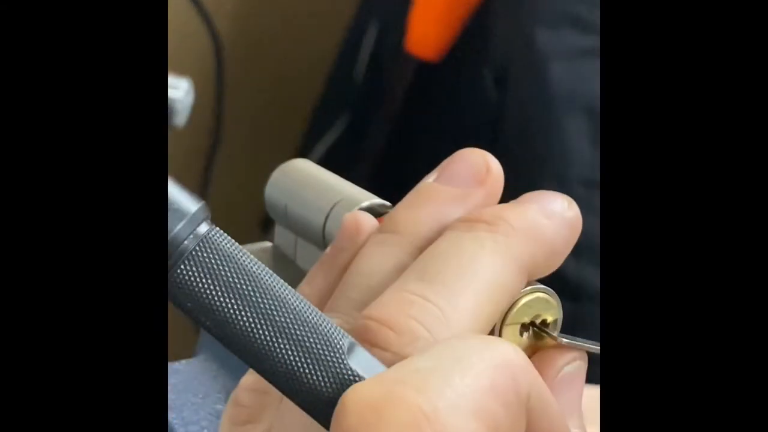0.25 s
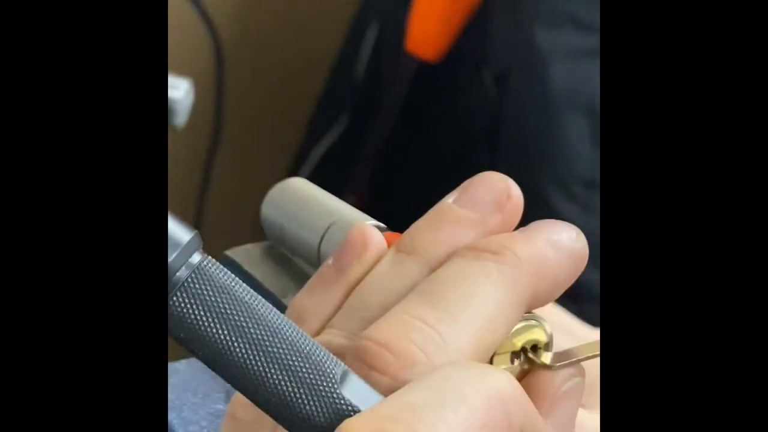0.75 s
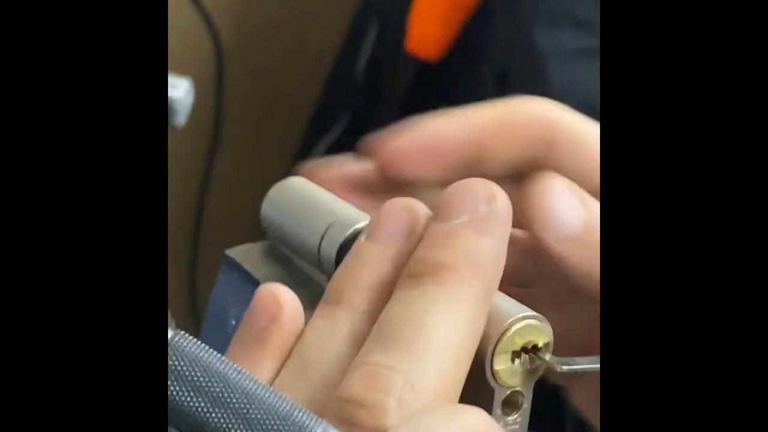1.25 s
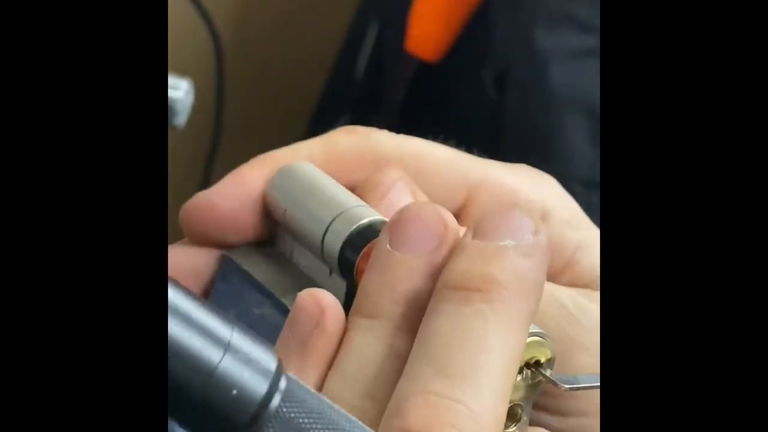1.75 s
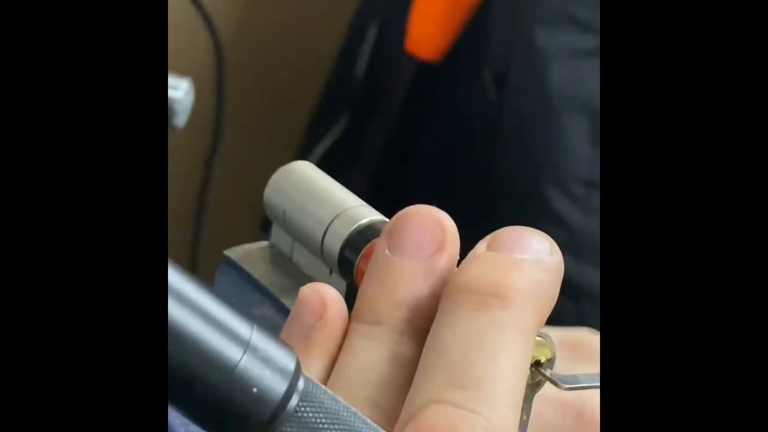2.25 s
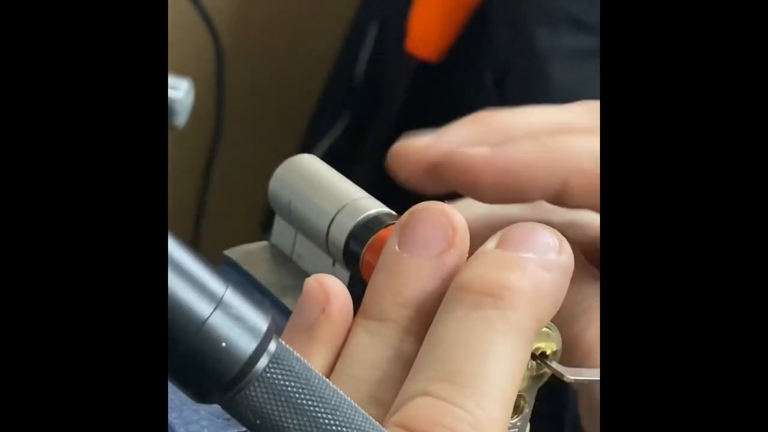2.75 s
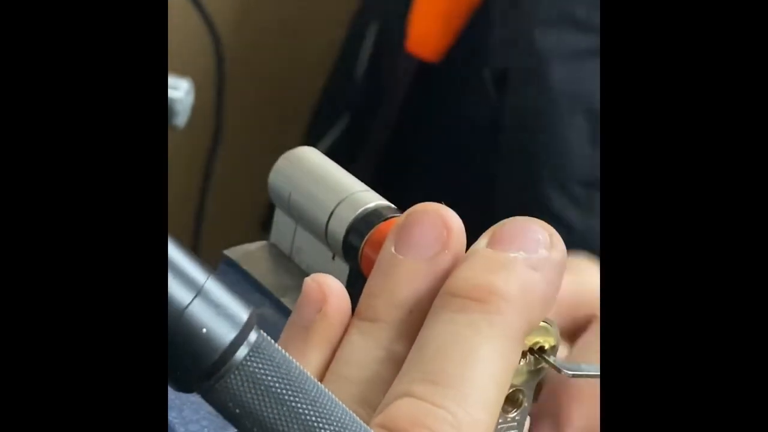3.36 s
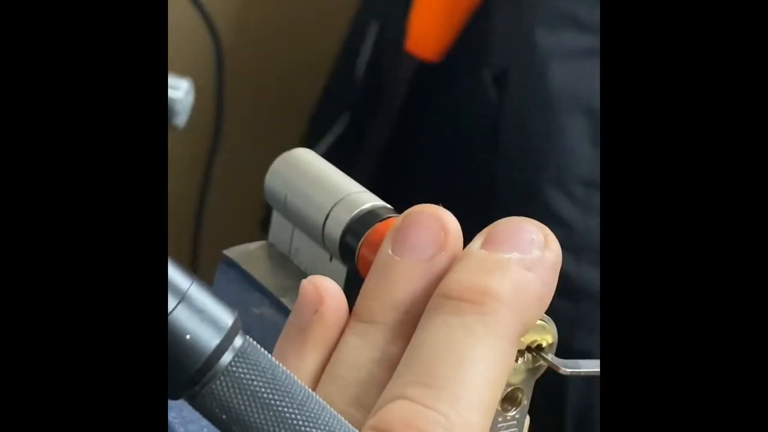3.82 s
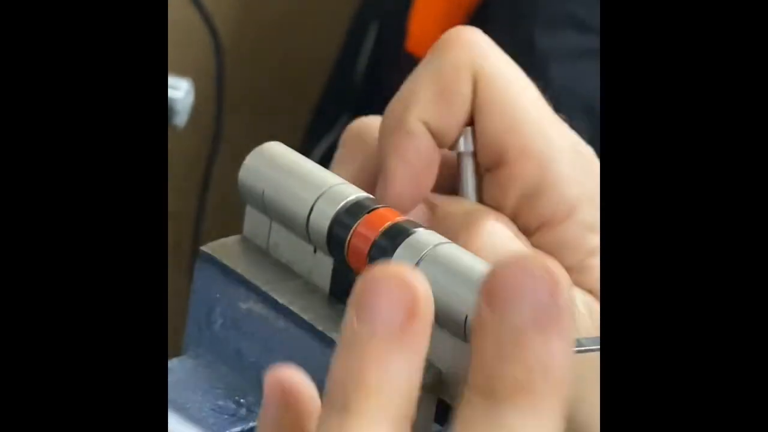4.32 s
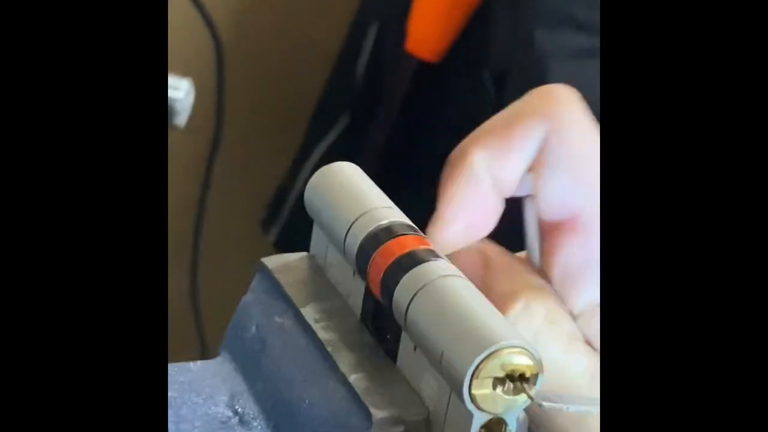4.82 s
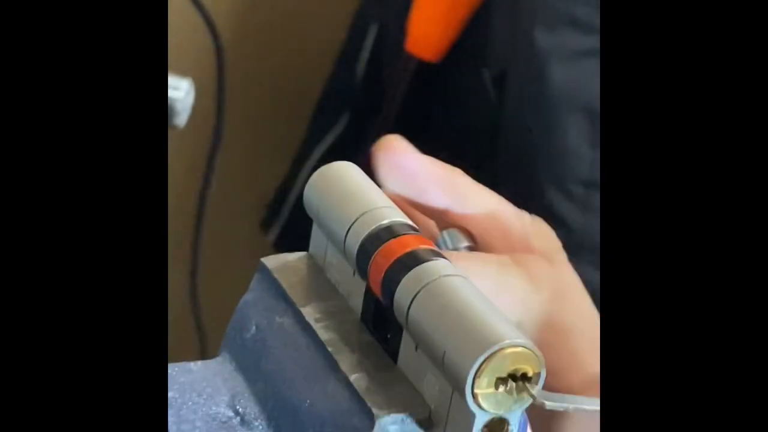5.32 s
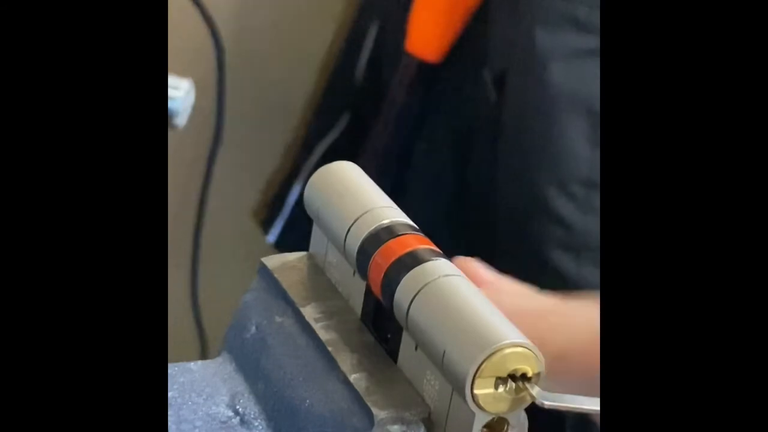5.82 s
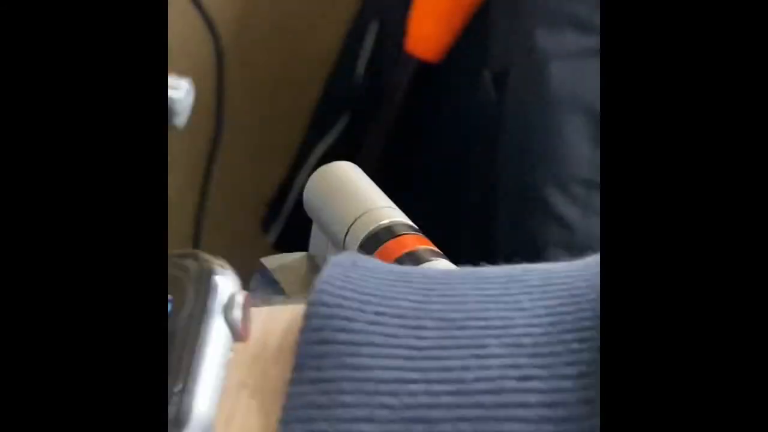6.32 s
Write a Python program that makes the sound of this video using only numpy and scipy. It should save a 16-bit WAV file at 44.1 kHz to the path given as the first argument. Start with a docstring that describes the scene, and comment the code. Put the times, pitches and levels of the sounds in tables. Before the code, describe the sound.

Small metallic ticks and soft finger rubs on a clamped lock cylinder, one very loud sharp snap with a bright ring, then quieter handling.

```python
"""A lock cylinder is handled in a bench vise: struck resonances and bursts of rattle make its ticks and snaps,
and short noise bursts through varied modes give them a bright edge. A steel part rings loudly as dying sines,
fingers and tools rub as clumped noisy slips, and short hollow notes creak.
The bench thumps in low swinging tones over a lumpy shaking.
A small quiet room adds short tails of sparse echoes and a faint hush; a pair of microphone ports hears it all."""
import sys
import numpy as np
from scipy import signal
from scipy.fft import rfft, irfft, next_fast_len
from scipy.io import wavfile
from scipy.ndimage import uniform_filter1d

SR = 44100
rng = np.random.default_rng(int(sys.argv[2]) if len(sys.argv) > 2 else 0)


def store_pcm(level_fs):
    """Save levels as 16-bit WAV."""
    pcm = np.round(np.clip(level_fs, -1, 1) * 32767).astype(np.int16)
    wavfile.write(sys.argv[1], SR, np.atleast_2d(pcm).T)


def how_loud(loudness_db):
    """Turn decibels into a plain amplitude multiplier (0 dB gives 1, 20 dB gives 10)."""
    steps = np.asarray(loudness_db, float) / 20
    return 10 ** steps


N = 290166

# ticks and snaps: (time [s], knock peak [dB], thud [dB, 7.5 below its peak], crack [dB, 7.5 below its peak],
# tilt toward the lower lock modes [dB])
TICKS = [(0.231, -58, -72.5, -99, 18.5), (0.367, -42, -45.5, -74, 1.5), (0.433, -30, -48.5, -52.5, -8),
         (0.565, -47, -64, -66.5, 8), (0.96, -46.5, -60.5, -67.5, 12), (1.022, -43, -51, -61.5, -5),
         (1.064, -48.5, -55, -66, -19), (1.098, -43, -48, -77.5, -2), (1.147, -41.5, -72, -72, -5),
         (1.162, -45.5, -56, -80, -6), (1.216, -53, -80, -65, -22), (1.46, -56.5, -73, -90, 16),
         (1.631, -49, -58.5, -91, -1), (1.79, -54, -66.5, -71, 7), (2.052, -39.5, -56, -62.5, 0.5),
         (2.112, -40.5, -61, -51.5, 2), (2.125, -35.5, -50, -71, 21), (2.188, -48, -58, -98, 25),
         (2.611, -38, -50.5, -52, -11.5), (2.621, -39, -50.5, -58, 4), (2.639, -37.5, -56.5, -52.5, -3),
         (2.74, -5.5, -25.5, -15.5, -4.5), (3.138, -52, -54, -99, 5), (3.35, -41.5, -55.5, -77, -1.5),
         (3.501, -26.5, -41.5, -33, -9.5), (3.845, -49, -73.5, -63, -11), (4.164, -48, -54, -79, -1),
         (4.171, -45.5, -65.5, -67.5, 7), (4.371, -67.5, -82, -68, -1.5), (4.578, -39.5, -52, -84, 30),
         (5.19, -63, -53.5, -87.5, -4.5), (5.516, -54.5, -53, -87.5, 8), (5.716, -68, -63, -61.5, -5.5)]
# lock in the jaws: (frequency [Hz], level [dB], t60 [s])
LOCK_MODES = [(837, -12.5, 0.043), (1087, -3, 0.023), (1747, 4, 0.014), (2522, -17.5, .018)]
# vise body: (frequency [Hz], level [dB], t60 [s])
JAW_MODES = [(310, 1, 0.018), (392, -3, .018), (473, -3.5, 0.018)]
# spectrum of the cracks: (frequency [Hz], level [dB per Hz])
CRACK_TONE = [(1470, -38), (2500, -14), (3920, -18), (4750, -13), (5360, -1.5), (5700, -0.5), (7510, -15),
              (8290, -10.5), (9220, -25.5), (10700, -12.5), (12500, -32), (14300, -20), (15500, -39)]
CRACK_FROM_HZ = 2700
# length of contact; looseness (0-1) of a -44.5 dB knock and its loss per dB of harder knock
CONTACT_S, LOOSENESS, FIRMER_PER_DB = 0.0041, 0.55, 0.08

# bright edge of the ticks: (time [s], level [dB, 3 above peak])
BITES = [(0.3893, -48), (0.41, -43), (0.5646, -50), (0.9617, -54), (1.0226, -49), (1.099, -42.5),
         (1.1377, -50), (1.1484, -51), (1.2017, -56.5), (1.7893, -46), (2.0557, -38), (2.1116, -41.5),
         (3.3482, -60), (3.844, -45), (4.1654, -40.5), (4.1735, -43), (4.2016, -57), (4.5796, -59),
         (5.7186, -49.5)]
# resonances of that edge, varied each time: (frequency [Hz], level [dB], t60 [s])
BITE_MODES = [(2520, 2.5, 0.032), (3156, -3, 0.018), (3660, -4.5, 0.023), (4180, -3.5, .02),
              (5860, -12, .02)]

# blows on a steel part: (time [s], peak [dB], contact length [s])
STRIKES = [(2.611, -50.5, 0.0011), (2.612, -58, 0.049), (2.668, -45.5, 0.069), (2.746, -18.5, .001),
           (3.498, -33, 0.00095)]
# steel part, loudest mode first: (frequency [Hz], level [dB], t60 [s])
STEEL_MODES = [(5636, -5, 0.16), (5503, -6, 0.098), (5230, -7, .05), (5810, -9.5, 0.041),
               (8135, -9.5, 0.054), (10750, -11.5, 0.079), (11040, -6.5, 0.1), (11170, -10.5, 0.11)]
# one tap of a thin tool: (time [s], level [dB])
TOOL_TAP = (3.844, -52)
# thin tool: (frequency [Hz], level [dB], t60 [s])
TOOL_MODES = [(4140, -6, .12), (6691, -7, .1), (8839, -8, .06), (11390, -5, .07), (12800, -10, .07),
              (14160, 0, .09)]

# strokes of fingers, sleeve or tool: (start of hold [s], hold [s], pressure [dB, 2.5 above middle rms],
# weight = low part re middle [dB], sharpness = high part re middle [dB])
RUBS = [(0.35, .03, -69, 19, -16), (0.387, .07, -49.5, 2.5, -17.5), (0.459, .1, -68.5, 21, -12.5),
        (0.658, .08, -84, 2, -17), (.76, 0.098, -71, 12, -14.5), (1.05, .04, -66.5, 5.5, -7.5),
        (1.199, 0.054, -71, -5, -3), (1.496, 0.036, -86, 3, 5), (1.574, .04, -72.5, 7, -11),
        (1.616, 0.024, -64.5, 8.5, -14), (1.911, .03, -80, 10.5, -10), (1.955, 0.072, -74.5, -8, -9),
        (2.141, .1, -70, 4.5, -37), (2.298, .07, -71, 5, -17), (2.38, 0.092, -78, 12, -20),
        (2.615, 0.081, -56.5, -3.5, -13.5), (2.725, .015, -50, -8, -25), (3.0, .055, -57.5, 0, -33.5),
        (3.12, .04, -60, 0.5, -44), (3.298, .04, -65.5, 2, -28), (3.472, 0.029, -71, -12, -30),
        (3.559, .05, -69, 17, -14), (4.044, 0.038, -75.5, -10, -19), (4.165, 0.038, -59.5, 0.5, -10),
        (4.209, 0.031, -68.5, 13.5, -0.5), (4.364, .08, -78, -10, 0.5), (4.643, 0.11, -53, 3, -13),
        (4.789, 0.045, -72.5, 16.5, -7), (4.85, 0.077, -81, 11, -8), (5.027, 0.055, -72, 12.5, -4),
        (5.178, .13, -71, 11, -14.5), (5.358, .12, -79, 10, -14), (5.524, 0.094, -65, 8, -15.5),
        (5.646, .06, -74.5, 4, -4), (5.719, 0.066, -70, 8, -5), (5.867, .13, -74, 12, -2.5),
        (6.074, .1, -78.5, 12.5, 0), (6.205, 0.043, -57.5, 1.5, -3), (6.3, .08, -77.5, 0, -6),
        (6.477, 0.041, -82.5, 0, -10)]
# scuffs, where a contact skids off: (time [s], fade by 30 dB [s, at least 0.01 is used],
# pressure, weight and sharpness as for the strokes [dB])
SCUFFS = [(0.436, 0.042, -41.5, -15, -3), (.563, -0.08, -60, -1, -16.5), (.96, 0.2, -58, -1, -10.5),
          (1.019, 0.08, -60.5, 9.5, -8), (1.099, 0.0538, -46, -10, -18.5), (1.147, 0.08, -60.5, 9, -6.5),
          (1.46, -0.4, -69, -7, -18), (1.79, -0.03, -64.5, 7, 8.5), (1.865, 0, -65, -10, -18),
          (2.056, 0.08, -48.5, 0.5, -10.5), (2.114, 0.01, -49, -11, -7.5), (3.348, 0.13, -55, -3.5, -22),
          (3.845, 0.0531, -61, -9, 7.5), (4.578, -0.04, -57, 0.5, -14.5), (5.516, 0.06, -60.5, 10.5, -25),
          (5.95, 0.19, -68.5, 10, -3), (3.136, -0.04, -60, -4, -34), (6.44, .04, -83, -5, 7),
          (6.228, 0.07, -53.5, 1, -4)]
# rubbing noise: (frequency [Hz], level [dB per Hz])
SKIN_TONE = [(120, -30), (200, -1), (490, -4), (660, -6), (1140, -7), (1570, -7.5), (2500, -15),
             (3000, -23.5), (4180, -19.5), (4820, -25.5), (9000, -30.5), (11900, -38), (15600, -56)]
# small parts inside the lock: (frequency [Hz], level [dB], t60 [s])
PIN_MODES = [(3650, -1, 0.036), (4229, -1.5, .025), (5860, -2, 0.02), (6500, -6, .02), (7950, -10, .03)]
RUB_TO_HZ = 2600  # top of the lock ringing under a rub
RUB_RISE_S, RUB_FALL_S, SCUFF_RISE_S = 0.043, 0.046, 0.012  # time for 30 dB in the middle part
LOW_STRETCH, HIGH_STRETCH = 1.137, 0.9  # rise and fall times of the low and high parts, re middle

# creak pulses: (time [s, 4 ms after onset], peak [dB], centre pitch [Hz], length [s])
CREAKS = [(5.763, -48, 420, 0.017), (5.808, -46.5, 470.4, 0.018), (5.856, -47.5, 456, 0.021),
          (5.903, -45, 440, 0.025), (5.95, -43, 443.5, 0.027), (5.992, -61.5, 422, 0.031)]

# bench thumps: (time [s], peak [dB], pitch [Hz])
THUMPS = [(0.377, -35.5, 141), (0.468, -29, 107), (0.563, -38, 114.5), (0.776, -51.5, 103),
          (0.838, -46.5, 110.5), (1.043, -41, 106), (1.139, -31.5, 72.1), (1.249, -66, 81),
          (1.344, -54, 84), (1.615, -53.5, 76.5), (1.642, -47.5, 84), (1.685, -50, 79), (1.811, -54.5, 86),
          (1.894, -45.5, 83.4), (2.08, -43, 74), (2.143, -47, 112), (2.335, -44.5, 117),
          (2.618, -48.5, 127.3), (2.735, -28, 141.8), (3.051, -54.5, 113), (3.359, -48, 99),
          (3.425, -45, 68), (3.511, -39, 118.2), (3.665, -52.5, 94), (4.167, -44.5, 133.6),
          (4.217, -35.5, 58.9), (4.218, -31, 97.4), (4.459, -51, 71.4), (4.596, -30, 113.3),
          (4.688, -43.5, 139.9), (4.796, -33.5, 107.3), (5.07, -46, 110.9), (5.186, -52, 95),
          (5.273, -45, 59.9), (5.37, -51, 109.7), (5.533, -46, 59.4), (5.534, -33.5, 112.4),
          (5.599, -52, 83), (5.766, -45.5, 73.5), (5.901, -52, 110.5), (5.96, -46.5, 124),
          (6.204, -47.5, 106.6)]
# spectrum of the bench shaking: (frequency [Hz], level [dB per Hz])
SHAKE_TONE = [(12, -48), (20, -24), (48, -5), (70, 8.5), (129, -2.5), (162, -13.5), (195, -21.5),
              (231, -23.5), (260, -23.5), (340, -50.5), (570, -120)]
THUMP_T60_S = 0.1
# shaking at rest; what each thump stirs up, re the thump's peak
REST_DB, SHAKE_DB, SHAKE_RISE_S, SHAKE_T60_S = -70, -14, 0.086, 0.31

# room echoes: (frequency [Hz], t60 [s], starting level [dB])
ROOM = [(100, 0.1, -5.5), (405.3, 0.43, -3), (1000, 0.18, 0.5), (2010, 0.32, -7.5), (3370, .28, -2.5),
        (4957, .22, -2), (8000, 0.27, -1.5), (11400, 0.28, 0.5), (12515, 0.12, -6.5)]
ROOM_DB = -23.5  # gain on the whole tail
# spectrum of the hush: (frequency [Hz], level [dB per Hz])
AIR_TONE = [(88, -28.5), (150, 3.5), (205, -14), (359, -4), (751, -22.5), (1290, -24), (1700, -23.5),
            (2700, -31), (4310, -34), (4840, -40.5), (5650, -29.5), (10500, -41.5), (15500, -55.5)]
AIR_DB = -76  # rms of the common part, before its slight wavering
# the two microphone ports: (frequency [Hz], lag of the right [radians], left re right [dB],
# gain on the unlike sound [dB])
PORTS = [(100, 0.17, 0, -30.5), (346, 0.52, 1.5, -12), (764, 1.38, 4.5, -4), (1048, 1.3, 1, 0),
         (1740, 0.13, 0.5, -21.5), (2380, 1.15, -0.5, -16), (3372, 0.1, 0, -16), (4500, 1.4, -1.5, -5),
         (5283, 1, 1, -26.5), (5800, 0.78, -1, -25.5), (6900, 0.7, 0.5, -9), (8600, 1.65, -1, -7),
         (10300, 1.5, -0.5, -1), (13500, 2.2, -0.5, 3)]


def read(points, hz, column=1):
    """Reads a table on a log-frequency axis."""
    table = np.transpose(points)
    return np.interp(np.log(hz + 1), np.log(table[0] + 1), table[column])


def evened(x):
    """Brings the rms to one."""
    return x / np.sqrt(np.mean(x ** 2) + 1e-20)


def peaked(x):
    """Brings the peak to one."""
    return x / abs(x).max()


def add(mix, s, sound):
    """Mixes a sound in at time s."""
    part = mix[round(s * SR):][:len(sound)]
    part += sound[:len(part)]


def colour(x, points, lo_hz=1, hi_hz=22000):
    """Causal filter with the spectrum of a table, rolled off steeply outside lo-hi."""
    hz = abs(np.fft.fftfreq(4096, 1 / SR)) + 1
    edges = (1 + (lo_hz / hz) ** 10) * (1 + (hz / hi_hz) ** 10)
    gain = how_loud(read(points, hz)) / np.sqrt(edges)
    # minimum phase keeps the onset of each burst sharp
    response = np.exp(np.conj(signal.hilbert(np.log(np.maximum(gain, 1e-5)))))
    taps = np.fft.ifft(response).real[:2048]
    taps = taps.reshape((1,) * (x.ndim - 1) + (-1,))
    return signal.oaconvolve(x, taps, axes=-1)[..., :x.shape[-1]]


def ring(modes, length=0.36):
    """Response of a struck body: dying sines."""
    t = np.arange(round(length * SR)) / SR
    return sum(how_loud(db - 60 * t / t60) * np.sin(2 * np.pi * hz * t) for hz, db, t60 in modes)


def softened(x, hi_hz):
    """Low-pass that softens the onset of the ringing and keeps hiss out of it."""
    return signal.sosfilt(signal.butter(4, min(hi_hz, 9000), fs=SR, output="sos"), x)


def ticks():
    """Each contact knocks the lock, thuds in the vise and cracks; loose ones rattle for a moment."""
    out, t = np.zeros(N), np.arange(4000) / SR
    jaws = softened(ring(JAW_MODES, 0.1), 900)
    for s, knock_db, thud_db, crack_db, tilt_db in TICKS:
        loose = np.clip(LOOSENESS - FIRMER_PER_DB * (knock_db + 44.5), 0, 1)
        grains = rng.standard_normal(len(t)) * (rng.random(len(t)) < 0.15)
        rattle = grains * np.sqrt(t / CONTACT_S) * np.exp(-t / CONTACT_S)

        grip = 1 + 0.094 * loose ** 2 * rng.standard_normal(len(LOCK_MODES))  # a loose grip shifts the modes
        modes = [(hz * g, db + tilt_db * (hz < 1400), t60) for (hz, db, t60), g in zip(LOCK_MODES, grip)]
        lock = softened(ring(modes, 0.1)[:len(t)], 3200)
        firm = lock * (1 - np.exp(-(t / (0.72 * CONTACT_S)) ** 2))  # a firm blow swells as the parts seat
        shaken = peaked(signal.fftconvolve(rattle, lock)[:len(t)])
        shaken = shaken + 0.5 * peaked(colour(rattle, SKIN_TONE, 490, 2100))
        knock = peaked((1 - loose) * peaked(firm) + loose * shaken)

        thud = peaked(signal.fftconvolve(rattle, jaws))
        crack = peaked(colour(rattle * np.exp(-0.6 * t / CONTACT_S), CRACK_TONE, CRACK_FROM_HZ))
        add(out, s, how_loud(knock_db) * knock)
        add(out, s + 0.002, how_loud(thud_db + 7.5) * thud)
        add(out, s, how_loud(crack_db + 7.5) * crack)
    return out


def bites():
    """Bright edge of the ticks: a noise burst of a few milliseconds through modes varied each time."""
    out, t = np.zeros(N), np.arange(200) / SR
    for s, db in BITES:
        varied = rng.standard_normal((len(BITE_MODES), 2))
        modes = [(hz * (1 + 0.037 * a), level + 4.6 * b, t60)
                 for (hz, level, t60), (a, b) in zip(BITE_MODES, varied)]
        burst = rng.standard_normal(len(t)) * np.exp(-t / 0.0015)
        bite = softened(signal.fftconvolve(burst, ring(modes, 0.05)), 7500)
        add(out, s, how_loud(db - 3) * peaked(bite))
    return out


def steel():
    """Short blows ring all the steel modes, long contacts only the first; a thin tool is tapped once."""
    out = np.zeros(N)
    for s, db, length in STRIKES:
        contact = np.arange(round(length * SR)) / SR
        modes = STEEL_MODES if length < 0.005 else STEEL_MODES[:1]
        push = sum(np.cos(2 * np.pi * hz * contact) for hz, _, _ in modes)
        push = push * np.exp(-1.5 * contact / length)
        add(out, s, how_loud(db) * peaked(signal.fftconvolve(push, ring(modes))))
    add(out, TOOL_TAP[0], how_loud(TOOL_TAP[1]) * ring(TOOL_MODES))
    return out


def rubbing():
    """Dense clumped slips; pressure, weight and sharpness set how much of lock, vise and hiss they stir."""
    clumps = how_loud(2.5 * evened(uniform_filter1d(rng.standard_normal(N), 300)))
    slips = rng.standard_normal(N) * how_loud(2.0 * rng.exponential(1, N))
    slips = slips * (rng.random(N) < 0.2) * clumps

    def stirred(body):
        """Slips ringing a body, brought to unit rms."""
        return evened(signal.oaconvolve(slips, body)[:N])

    lock = stirred(softened(ring(LOCK_MODES, 0.1), RUB_TO_HZ))
    jaws = stirred(softened(ring(JAW_MODES, 0.1), 900))
    pins = stirred(ring(PIN_MODES, 0.1))
    middle = evened(colour(slips, SKIN_TONE, 650, 2300)) + 0.33 * lock
    low = jaws + 0.54 * evened(colour(slips, SKIN_TONE, 200, 760))
    high = evened(colour(slips, SKIN_TONE, 2600)) + 0.4 * pins
    return how_loud(-2.5) * sum(gain * evened(part) for gain, part in zip(stroke_gain(), (middle, low, high)))


def stroke_gain():
    """Strokes swell, hold and fade; scuffs rise quickly and fade. Gains of the middle, low and high parts."""
    t, power = np.arange(0, N / SR + 0.002, 0.001), np.zeros(1)
    shapes = [(s, hold_s, RUB_RISE_S, RUB_FALL_S, *rest) for s, hold_s, *rest in RUBS]
    shapes += [(s, 0, SCUFF_RISE_S, fade_s, *rest) for s, fade_s, *rest in SCUFFS]
    stretch = np.array([[1], [LOW_STRETCH], [HIGH_STRETCH]])
    for s, hold_s, rise_s, fall_s, pressure_db, weight_db, sharp_db in shapes:
        before = np.maximum(s - t, 0) / rise_s
        after = np.maximum(t - s - hold_s, 0) / max(fall_s, 0.01)
        peaks_db = pressure_db + np.array([[0], [weight_db], [sharp_db]])
        power = power + how_loud(peaks_db - 30 * (before + after) / stretch) ** 2
    return [np.interp(np.arange(N) / SR, t, np.sqrt(row)) for row in power]


def creak():
    """A run of slips, each a short hollow note."""
    out = np.zeros(N)
    for s, db, hz, length in CREAKS:
        t = np.arange(round(length * SR)) / SR
        wander = 7.6 * np.cumsum(rng.standard_normal(4000))[:len(t)] / np.sqrt(SR)  # uneven slips blur the pitch
        note = np.sin(2 * np.pi * hz * t + wander)
        add(out, s - 0.004, how_loud(db) * note * np.sin(np.pi * (t / length) ** 1.1) ** 2)
    return out


def bench():
    """Soft low swings of the bench top after each push, over a lumpy shaking that the pushes stir up."""
    out, t = np.zeros(N), np.arange(SR // 2) / SR
    shake_power = np.full(N, how_loud(REST_DB) ** 2)
    stir = peaked((1 - np.exp(-t / SHAKE_RISE_S)) * how_loud(-60 * t / SHAKE_T60_S))
    for s, db, hz in THUMPS:
        swell = 1 - np.exp(-(t * hz / 0.83) ** 2)  # builds up in about the first cycle
        swing = swell * how_loud(-60 * t / THUMP_T60_S) * np.sin(2 * np.pi * hz * t)
        add(out, s, how_loud(db) * peaked(swing))
        add(shake_power, s, (how_loud(db + SHAKE_DB) * stir) ** 2)
    return out + np.sqrt(shake_power) * evened(colour(rng.standard_normal(N), SHAKE_TONE))


def room(x):
    """Sparse taps of random sign, each band dying at its own speed; two unlike tails."""
    taps = np.zeros((2, SR // 2))
    at = np.arange(220, SR // 2 - 20, 20) + rng.integers(0, 20, (2, (SR // 2 - 221) // 20))
    np.put_along_axis(taps, at, rng.choice([-1., 1.], at.shape), 1)
    hz, t, bands = signal.stft(taps, SR, nperseg=256)
    decay_db = read(ROOM, hz, column=2)[:, None] - 60 * t / read(ROOM, hz)[:, None]
    tail = signal.istft(bands * how_loud(decay_db), SR, nperseg=256)[1]
    return signal.oaconvolve(x[None], how_loud(ROOM_DB) * tail, axes=1)[:, :N]


def air():
    """Faint steady hush of room and microphone, wavering a little."""
    waver = how_loud(0.5 * evened(uniform_filter1d(rng.standard_normal(N), 3000)))
    return how_loud(AIR_DB) * waver * evened(colour(rng.standard_normal((2, N)), AIR_TONE))


def scene():
    """Direct sound is common to both sides; room and hush also carry an unlike part."""
    direct = ticks() + bites() + steel() + rubbing() + creak()
    (wet, wet_unlike), (hush, hush_unlike) = room(direct), air()
    common = direct + wet + hush + bench()
    unlike = how_loud(3) * wet_unlike + how_loud(9.0) * hush_unlike
    return np.array([common + unlike, common - unlike])


def roll_off(x):
    """The treble ends steeply here."""
    return signal.sosfilt(signal.butter(12, 16080, fs=SR, output="sos"), x)


def record(dry):
    """The port pair turns part of the common sound into a left-right difference that varies with pitch."""
    size = next_fast_len(N)
    hz = np.fft.rfftfreq(size, 1 / SR)
    common = rfft((dry[0] + dry[1]) / 2, size)
    unlike = rfft((dry[0] - dry[1]) / 2, size)
    lag = np.clip(read(PORTS, hz), -2.98, 2.98)
    right_by_left = how_loud(-read(PORTS, hz, column=2)) * np.exp(-1j * lag)
    side = common * (1 - right_by_left) / (1 + right_by_left)
    side = side + unlike * how_loud(read(PORTS, hz, column=3))
    mix = irfft(np.array([common + side, common - side]), size)[:, :N]
    return roll_off(mix)


dry = scene()
out = record(dry)
store_pcm(out)
```